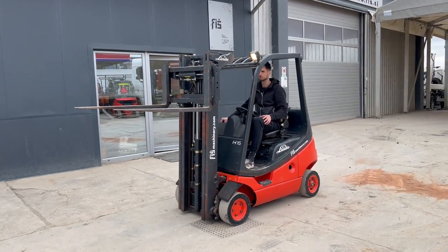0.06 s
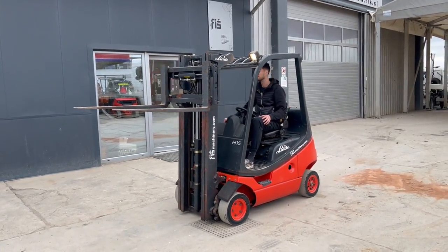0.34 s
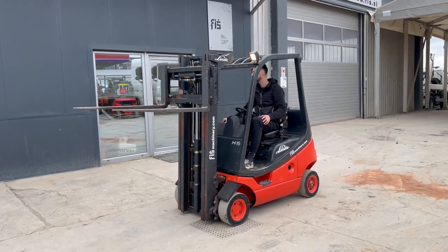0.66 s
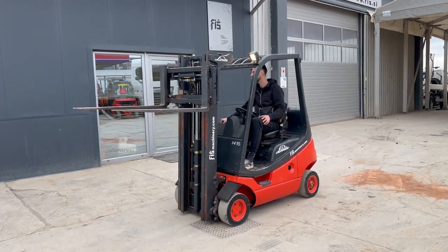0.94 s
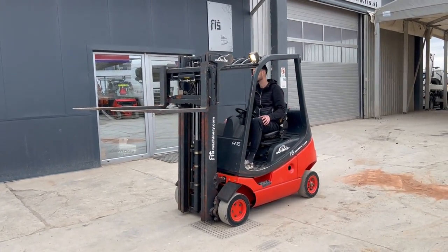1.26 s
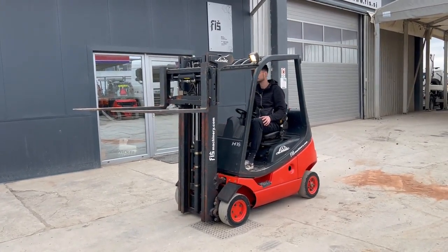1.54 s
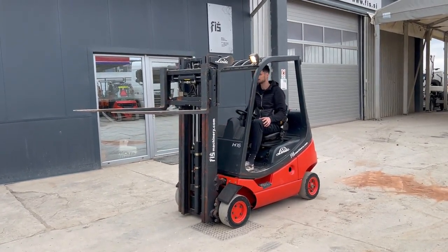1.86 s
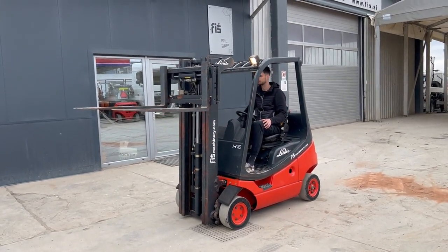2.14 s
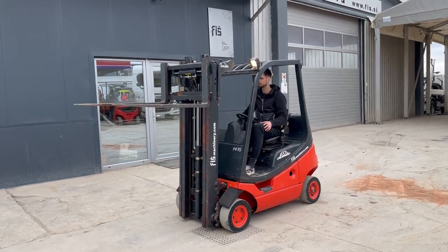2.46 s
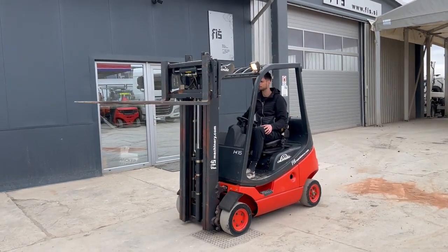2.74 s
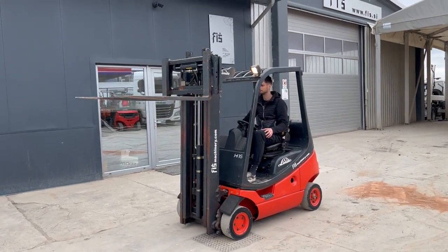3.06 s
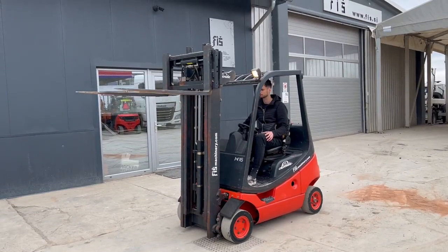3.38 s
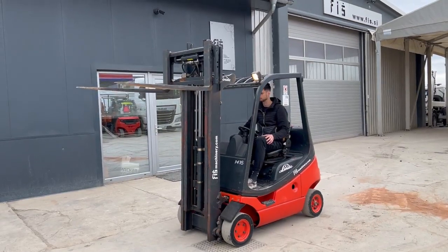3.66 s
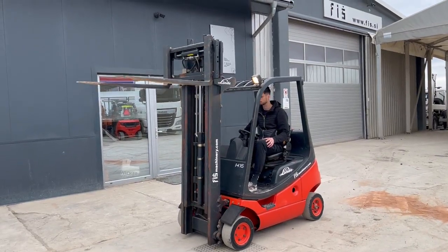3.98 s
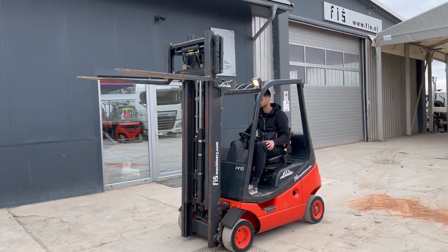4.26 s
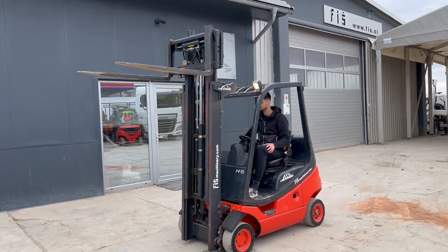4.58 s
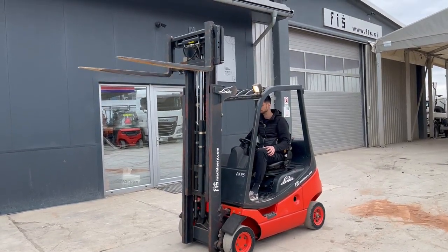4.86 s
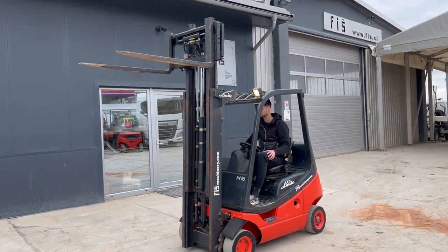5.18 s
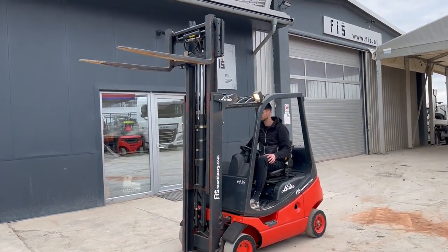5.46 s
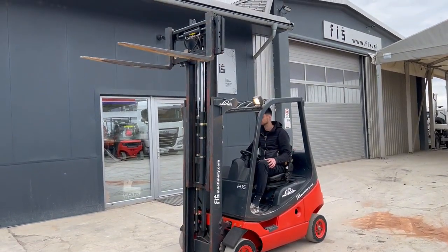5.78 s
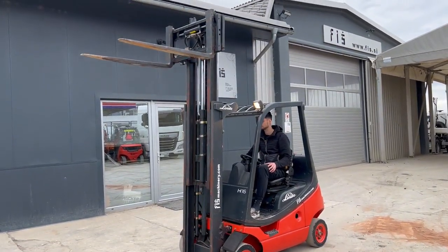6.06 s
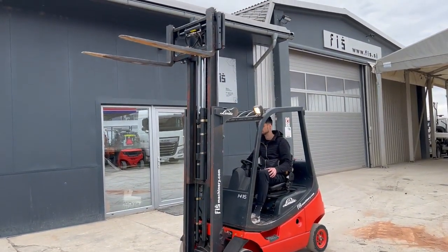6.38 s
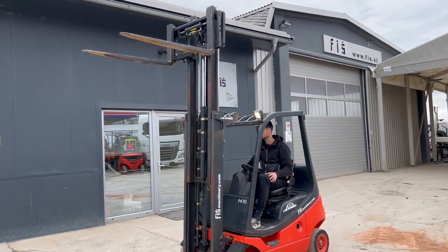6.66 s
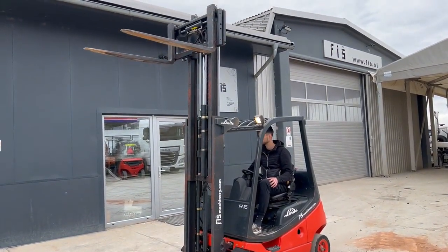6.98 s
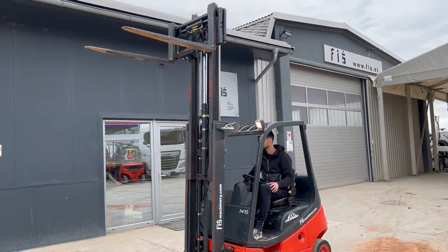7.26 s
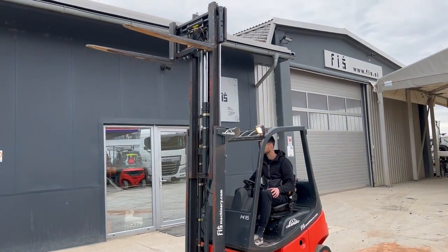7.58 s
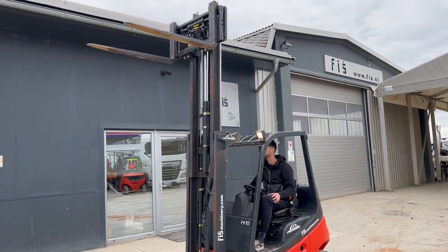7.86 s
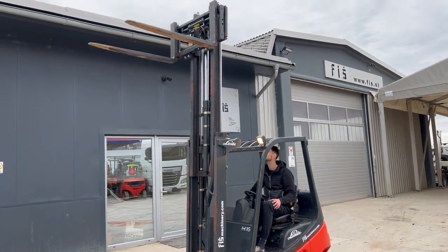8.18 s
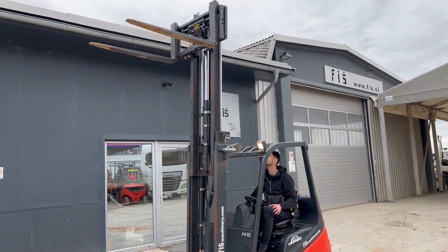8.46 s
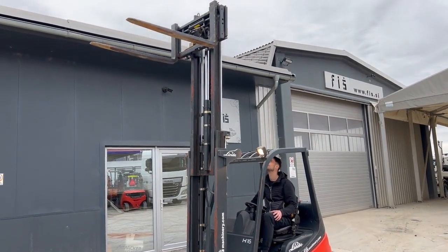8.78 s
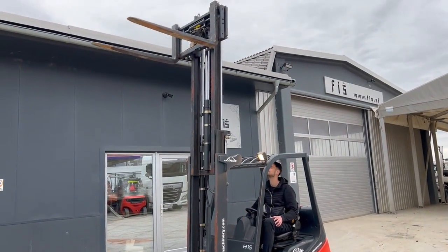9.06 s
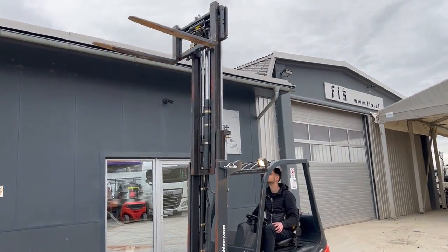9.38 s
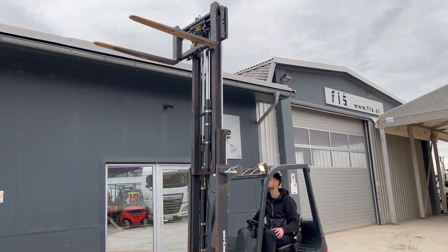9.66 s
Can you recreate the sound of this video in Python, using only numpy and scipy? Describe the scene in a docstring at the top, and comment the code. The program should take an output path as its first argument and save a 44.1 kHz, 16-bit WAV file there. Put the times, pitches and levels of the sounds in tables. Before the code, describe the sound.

Outdoors in gusty wind, a forklift's throbbing engine dips and picks up, its hydraulics whining as the steel mast clanks twice.

```python
"""A concrete yard in front of a shed wall, where a four-cylinder forklift is working.
Its engine sags, then revs up: the exhaust throbs, the block rumbles and the valve gear clatters.
The engine drives a whining gear pump, and oil hisses through valves and rushes as the forks rise.
The steel mast clanks twice as its stages take up the load. Gusts of wind buffet the microphone."""
import sys
import numpy as np
from scipy import signal
from scipy.fft import rfft, irfft
from scipy.io import wavfile
from scipy.ndimage import uniform_filter1d

SR = 44100
rng = np.random.default_rng(int(sys.argv[2]) if len(sys.argv) > 2 else 0)


def unload_wav(signal):
    """Save mono or channel-first audio to the path in sys.argv[1] as 16-bit WAV at rate SR, clipped to [-1, 1]."""
    wavfile.write(
        sys.argv[1],
        SR,
        np.round(np.clip(np.atleast_2d(signal).T, -1, 1) * 32767).astype(np.int16),
    )


N = 433040
T = np.arange(N) / SR
HZ = np.maximum(np.fft.rfftfreq(N, 1 / SR), 1)
NO_LOAD_HZ = 58.5   # firings per second with no load

# engine speed (time [s], firing rate [Hz])
ENGINE_SPEED = [(0, 50), (.3, 54.3), (.52, 54.4), (.8, 46.4), (1.04, 38.5), (1.29, 46.3), (1.48, 47),
                (1.62, 45.4), (2.03, 37.7), (2.62, 48.6), (3.03, 51.4), (3.52, 56.1), (3.85, 57.4),
                (4.9, 57.15), (5.8, 55.75), (6.6, 54.75), (7.88, 54.55), (8.08, 52.4), (8.4, 52.5),
                (8.7, 52.75), (9.82, 52.6)]
# the driver eases off the pedal (start [s], end [s], exhaust drop [dB])
PEDAL_OFF = [(-.3, 1.1, 9.5), (1.398, 2.14, 16)]
# four steps of engine load (share of full load [0-1])
LOAD_STEPS = [.1, .37, .6, 1]
# exhaust tones (waves per engine cycle [count], then a level at each load step [dB])
EXHAUST_TONES = [(4, -5.5, -26, -21, -30), (5, -40, -22, -32, -30), (6, -24, -25, -33, -22),
                 (7, -43, -26, -17, -13), (8, -2, -2.5, -2.5, -10.5), (9, -9, -15, -36, -19),
                 (10, -14.5, -24, -21.5, -20.5), (11, -21, -16, -42, -47), (12, -12.5, -5, -3, -0.5),
                 (13, -16, -13, -24, -13), (14, -17.5, -11.5, -21, -17), (15, -38, -18, -11.5, -20),
                 (16, -18, -19, -24, -8.5), (20, -22, -29, -31, -23), (21, -28, -22, -19.5, -31),
                 (23, -26.5, -36, -45, -27), (25, -24, -40, -35, -29), (28, -26.5, -33, -26.5, -43),
                 (31, -47, -51, -29, -27), (35, -20, -44, -38, -39), (39, -35, -36, -46, -42),
                 (49, -27.5, -37, -34, -50)]
# some cylinders fire harder than others (strength of each [dB])
CYLINDER_STRENGTH = [3, -1, 1, -2]
# tone colour of the engine block and of the valve gear (frequency [Hz], level [dB])
BLOCK_COLOUR = [(100, -5.5), (180, 4.5), (260, 0.5), (340, 1), (440, -1.5), (520, 1), (600, -2.5),
                (680, 0.5), (780, -3.5), (880, -10.5), (1060, -2.5), (1250, -6.5), (1500, -20.5),
                (2500, -30)]
CLATTER_COLOUR = [(700, -47), (1200, -2), (1500, 2), (1750, 3), (2000, 2), (2200, 0), (2500, -1.5),
                  (3100, -3), (4000, -6.5), (5000, -10), (7000, -13), (10000, -14), (15000, -20.5)]
# loudness of each part (at no-load speed [dB], loss as firing slows [dB/Hz], change when lifting [dB])
BLOCK_LOUDNESS = (-39.5, 0.17, 0.68)
CLATTER_LOUDNESS = (-46.5, 0.25, 1.87)
PUMP_LOUDNESS = (-44, 0.067, -2.5)
# notes of the valve cover (pitch [Hz], width [Hz], level [dB])
COVER_NOTES = [(1054, 29, -54), (1217, 34, -59.5), (1750, 91, -64), (2070, 120, -61), (2575, 210, -59),
               (3520, 320, -61)]
# pump sound given off by pipes and mast (frequency [Hz], running free [dB], lifting [dB])
PUMP_COLOUR = [(199, 4.5, -10), (283, 2, -7), (350, -8, -12), (503, -5, -9), (584, -14, 0),
               (675, -26, -0.5), (870, -29, -16.5), (1100, -8, -8), (1300, -21, -12), (1450, -14, -28),
               (2030, -20, -21), (2320, -23, -10), (2790, -23, -16), (3600, -21, -16), (4430, -24, -19),
               (4870, -25, -25), (5200, -22, -18), (6600, -43, -28), (7600, -40, -18.5), (8650, -43, -33)]
# single pump tones sing out as speed and oil column change
# (tone number [count], peak time [s], width [s], level [dB])
PUMP_SINGING = [(1, 0.49, 0.16, -43), (1, 2.58, 0.45, -41.5), (4, 0.68, 0.2, -48.5), (4, 1.42, 0.12, -46),
                (4, 3.17, 0.13, -52), (6, 4.8, 0.43, -53), (13, 4.3, .5, -64), (16, 4.8, .12, -62),
                (16, 6.24, .14, -60), (16, 7, 0.41, -66), (16, 9, .5, -66), (17, 3.2, .3, -68),
                (17, 5.55, 0.2, -57), (17, 7.2, 0.56, -65), (19, 4.1, 0.44, -63), (19, 9.4, 0.49, -70),
                (23, 4.55, 0.24, -60), (25, 7.2, .6, -65), (26, 9.05, 0.97, -61.5)]
# oil valves working as the truck moves about (opens [s], shuts [s], level [dB])
VALVE_OPENINGS = [(-.1, 0.412, -43), (.68, 1.325, -50.5)]
# wind strength (time [s], level [dB])
WIND_STRENGTH = [(0, -27), (.5, -28.5), (1.03, -19.5), (1.14, -32), (1.26, -20), (1.66, -40.5),
                 (2.1, -42.5), (2.9, -37), (3.55, -35), (3.8, -40.5), (5.15, -43), (5.45, -30),
                 (5.75, -33.5), (6.0, -25), (6.35, -31.5), (6.65, -27.5), (6.95, -30.5), (7.7, -32),
                 (8.0, -32.5), (8.5, -35), (8.8, -27.5), (9.5, -24.5), (9.82, -22.5)]
# tone colour of the wind (frequency [Hz], level [dB])
WIND_RUMBLE = [(20, -25), (32, -16), (48, -0.5), (70, 0), (110, -2), (160, -8), (220, -14), (320, -30),
               (500, -45), (1000, -95)]
# hard puffs of wind (time [s], level [dB], width [s], pitch [Hz])
WIND_PUFFS = [(.03, -24.5, 0.01, 199), (0.104, -19, 0.0086, 123), (0.249, -24.5, 0.035, 157),
              (0.349, -20.5, 0.025, 104), (0.789, -19, 0.038, 69.6), (0.893, -12, 0.0049, 140),
              (0.931, -17, 0.0064, 120), (.974, -18, 0.016, 170), (1.04, -19.5, 0.019, 82),
              (1.205, -18.5, 0.019, 176), (1.28, -16, 0.032, 103), (1.316, -13.5, 0.0078, 168),
              (1.352, -25.5, 0.022, 264), (1.508, -25, 0.015, 268), (1.555, -28, 0.0086, 266),
              (2.76, -21.5, 0.0055, 149), (2.783, -22, 0.007, 110), (2.87, -21.5, 0.019, 111),
              (2.904, -22, 0.0088, 110), (5.472, -30, 0.035, 61.4), (6.029, -25, 0.063, 87.3),
              (6.65, -23, 0.032, 113), (7.248, -25, 0.014, 98), (7.662, -25, 0.03, 61.6),
              (9.33, -19, 0.014, 124), (9.451, -21.5, 0.085, 79)]
# steel blows in the mast (time [s], level [dB], middle of the band [Hz], ringing [dB])
MAST_BLOWS = [(2.689, -19.5, 1120, -10), (2.712, -24, 1540, -12), (2.729, -20, 2010, -3.5),
              (2.74, -20.5, 480, -15), (2.757, -24, 357, -15), (2.836, -31.5, 796, -10),
              (7.894, -15, 2180, -2.5), (7.9, -18, 2600, 1), (7.912, -15, 990, -9),
              (7.921, -14.5, 2400, -18), (7.942, -17, 520, -9.5), (7.945, -18, 2300, -6),
              (7.955, -18.5, 520, -8)]
# ringing notes of the mast (pitch [Hz], level [dB], time to fade by 60 dB [s])
MAST_NOTES = [(269, -4, 0.28), (566, 1, 0.4), (622, 0, 0.4), (793, -17, 0.27), (1016, -2, 0.11),
              (1285, -12.5, 0.56), (1340, -4, 0.064), (1447, -7.5, 0.18), (1683, -8.5, 0.15),
              (1850, -20.5, 0.65), (2020, -3.5, 0.076), (2220, -6.5, 0.04), (2490, -6, 0.064),
              (2715, -10.5, 0.18), (3670, -10, 0.096), (3950, -11, 0.1), (5260, -14, 0.25)]
# crash of many crowded steel notes (frequency [Hz], level [dB])
CRASH_COLOUR = [(150, -25), (270, 6.5), (450, 7.5), (640, 6.5), (850, -2), (1200, -2.5), (1800, -6.5),
                (2400, -8.5), (3200, -9.5), (4000, -15), (4700, -16.5), (5350, -12.5), (6300, -14.5),
                (8000, -15), (15000, -12.5)]
# notes of the lift cylinder as oil flows (peak time [s], width [s], pitch [Hz], level [dB])
OIL_NOTES = [(4.1, 1, 1000, -56), (7.5, 0.82, 1230, -53.5), (4.2, 0.51, 1510, -53), (5.1, 1, 1960, -57),
             (4.9, 0.62, 2450, -54.5), (4.3, .4, 3700, -58), (6.2, 0.49, 2090, -52.5),
             (6.4, 0.66, 2600, -62), (7.4, 0.76, 3570, -60)]
# how alike the two microphones sound (frequency [Hz], likeness [0-1])
MIC_LIKENESS = [(200, 0.91), (450, 0.81), (700, 0.48), (1100, 0.57), (1500, 0.08), (2000, 0.57),
                (5300, 0.37), (7200, 0.74), (8500, 0.68), (9500, 1), (10700, 1), (11500, 0.91),
                (13000, 0.99)]
# how much louder the left one is (frequency [Hz], left minus right [dB])
LEFT_LOUDER = [(200, -3), (450, 1.5), (700, 1), (1100, 4), (2400, 0.8), (5300, 6), (7200, 2.5),
               (9500, -0.5)]
# how far the left one's wave runs ahead (frequency [Hz], phase [rad])
LEFT_AHEAD = [(0, 0.42), (450, 0.32), (1100, 1.08), (1500, 2.5), (2000, 5.37), (2900, 7.82), (5300, 5.6),
              (7200, 5.8), (8600, 4.9), (9400, 3.17), (10700, 3.11), (11300, 1.72), (12600, 0.68)]


def from_db(db):
    """Turn decibels into a number to multiply by."""
    return 10 ** (np.asarray(db) / 20)


def rms_one(x):
    """Scale a sound to an average strength (rms) of 1."""
    return x / np.sqrt(np.mean(x ** 2) + 1e-20)


def in_time(points):
    """Read a time table at every sample."""
    return np.interp(T, *np.transpose(points))


def at_hz(points):
    """Read a frequency table at every frequency, with octaves evenly spaced."""
    hz, value = np.transpose(points)
    return np.interp(np.log(HZ), np.log(np.maximum(hz, 1)), value)


def colour(x, spectrum):
    """Give a sound a tone colour, at strength 1."""
    return rms_one(irfft(rfft(x) * from_db(at_hz(spectrum)), N))


def resonate(x, hz, width_hz):
    """Keep a narrow band of a sound, at strength 1."""
    band = signal.butter(1, [hz - width_hz / 2, hz + width_hz / 2], "band", fs=SR)
    return rms_one(signal.lfilter(*band, x))


def drift(per_s):
    """A random wander, about 1 either side of zero."""
    return np.interp(T * per_s, np.arange(2048), rng.standard_normal(2048))


def ramp(start_s, length_s):
    """A straight rise from 0 to 1."""
    return np.clip((T - start_s) / length_s, 0, 1)


def swell(peak_s, width_s):
    """A smooth rise to 1 and fall."""
    return np.exp(-np.minimum(((T - peak_s) / width_s) ** 2 / 2, 50))


def running_db(loudness, firing_hz, pressure):
    """A part grows louder with speed and changes with oil pressure."""
    top_db, slope, lifting_db = loudness
    return top_db - slope * (NO_LOAD_HZ - firing_hz) + lifting_db * pressure


def governor(firing_hz, full_load_drop_hz=9.74, ease_s=0.088, press_s=0.14):
    """A slowed engine is under load and gets more fuel; off the pedal, the exhaust goes quiet."""
    load = np.clip((NO_LOAD_HZ - firing_hz) / full_load_drop_hz, 0, 1)
    drop_db = sum(db * (ramp(off, ease_s) - ramp(on, press_s)) for off, on, db in PEDAL_OFF)
    exhaust_db = -30.5 + 2.5 * load - drop_db
    return load, exhaust_db


def exhaust(cycle, level_db, load, smear=0.0097, uneven_db=0.6):
    """The firings make every fourth tone; uneven cylinders add the rest and make the beat limp."""
    waver_db = 0.8 + 1.8 * load ** 2
    out = np.zeros(N)
    for k, *by_load_db in EXHAUST_TONES:
        sign = -1 if k % 4 else 1
        shift = smear * k * rng.standard_normal()   # the silencer smears high tones most
        tone = sign * np.sin(2 * np.pi * (k * cycle + shift))
        out += tone * from_db(np.interp(load, LOAD_STEPS, by_load_db) + waver_db * drift(6))
    firing_strength = np.interp(4 * cycle, np.arange(1024), rng.standard_normal(1024))
    return np.sqrt(2) * from_db(level_db + uneven_db * firing_strength) * out


def engine_noise(cycle, spectrum, repeat, throb, scatter_db, size=3072):
    """The same knocks return every cycle, mixed with fresh noise; each firing makes them swell."""
    pattern = rng.standard_normal((2, size))
    returning = np.array([np.interp(cycle % 1 * size, np.arange(size), p) for p in pattern])
    fresh = rng.standard_normal((2, N))
    knocks = np.sqrt(repeat) * rms_one(returning) + np.sqrt(1 - repeat) * fresh
    firing = 4 * cycle
    firing_db = np.resize(CYLINDER_STRENGTH, 1024) + scatter_db * rng.standard_normal(1024)
    pulse = from_db(firing_db)[firing.astype(int)] * np.exp(-4 * (firing % 1))
    return colour(knocks * (1 + throb * pulse), spectrum)


def tappet(cycle, firing_hz, tick_cycles=0.16, scatter_db=1.4, db_per_hz=0.5):
    """A loose tappet (valve pusher) rings the valve cover once a cycle, softer at low speed."""
    age = cycle % 1 / tick_cycles
    strength = from_db(scatter_db * rng.standard_normal(1024))[cycle.astype(int)]
    rattle = strength * age * np.exp(-age) * rng.standard_normal((2, N))
    ring = sum(from_db(db) * resonate(rattle, hz, width_hz) for hz, width_hz, db in COVER_NOTES)
    return ring * from_db(-db_per_hz * (NO_LOAD_HZ - firing_hz))


def pump(cycle, firing_hz, level_db, pressure, flutter_db=3, churn_rad=0.74):
    """A twelve-tooth gear pump ripples the oil six times per firing, harsher when lifting."""
    angle = 2 * np.pi * 24 * cycle
    tooth_hz = 6 * firing_hz
    out = np.zeros((2, N))
    hz, *states = np.transpose(PUMP_COLOUR)
    for k in range(1, 28):
        free_db, lifting_db = [np.interp(k * tooth_hz, hz, db) for db in states]
        whine = from_db(level_db + free_db + pressure * (lifting_db - free_db))
        song = sum(from_db(db) * swell(s, width) for tone, s, width, db in PUMP_SINGING if tone == k)
        blur = churn_rad * drift(60)   # churning oil roughens the tones
        gain = np.hypot(whine, song) * from_db(flutter_db * drift(12))
        out += gain * np.sin(k * angle + blur + 2 * np.pi * rng.random((2, 1)))
    return out


def valve_hiss(open_s=0.052, fade_s=0.04):
    """Oil hisses through a valve until it shuts."""
    spectrum = [(1000, 0.5), (2500, 0), (3800, -0.5), (6000, -10.5), (10000, -9.5), (15000, -13.5)]
    flow = sum(from_db(db) * ramp(opens, open_s) * np.exp(-np.maximum(T - shuts, 0) / fade_s)
               for opens, shuts, db in VALVE_OPENINGS)
    return flow * colour(rng.standard_normal((2, N)), spectrum)


def wind(lumps_db=2.5, lumps_per_s=11, apart_db=-19):
    """Swirling air rumbles on the microphone, nearly alike on both sides; short puffs reach higher."""
    level_db = in_time(WIND_STRENGTH) + lumps_db * drift(lumps_per_s)
    swirls = colour(rng.standard_normal((2, N)), WIND_RUMBLE)
    swirl_strength = np.sqrt(uniform_filter1d(swirls ** 2, size=4000) + 1e-6)
    out = from_db(level_db) * swirls / swirl_strength
    for s, db, width_s, hz in WIND_PUFFS:
        near = np.abs(T - s) < 0.2
        narrow = signal.butter(2, [hz / 2, hz * 1.24], "band", fs=SR, output="sos")
        wide = signal.butter(2, [hz / 2, hz * 2.24], "band", fs=SR, output="sos")
        air = signal.sosfilt(np.vstack([narrow, wide]), rng.standard_normal((2, SR)))
        push = swell(s, width_s)[near]
        puff = push * air[:, -len(push):]
        out[:, near] += from_db(db) * puff * np.sqrt(np.sum(push ** 2) / np.sum(puff[0] ** 2))
    shared, apart = out
    return shared + from_db(apart_db) * apart * [[1], [-1]]


def mast_clanks(attack_s=0.0027, crash_s=0.013, echo_s=0.076, detune=0.0023, hard_db=-16, size=28000):
    """Each blow rings the steel rails; its crash dies fast and echoes between the walls."""
    out, t = np.zeros((2, N + size)), np.arange(size) / SR
    crash_noise = colour(rng.standard_normal((2, N)), CRASH_COLOUR)
    fade = from_db(1) * np.exp(-t / crash_s) + from_db(-13) * np.exp(-t / echo_s)
    for k, (s, db, middle_hz, ring_db) in enumerate(MAST_BLOWS):
        softness_db = max(hard_db - db, 0)   # gentle blows leave the high notes quiet
        ring = 0
        for hz, note_db, fade_s in MAST_NOTES:
            rail_hz = hz * (1 + detune * rng.standard_normal((2, 1)))   # near-twin rails beat
            gain = from_db(note_db - softness_db * hz / 4000 - 60 * t / fade_s)
            ring += gain * np.sin(2 * np.pi * (rail_hz * t + rng.random((2, 1))))
        crash = fade * crash_noise[:, k * size:(k + 1) * size]
        blow = np.minimum(t / attack_s, 1) * (from_db(ring_db) * ring + crash)
        # edges clash high, the fork carriage thuds low
        contact = signal.butter(2, [middle_hz / 2, middle_hz * 2], "band", fs=SR)
        start = int(s * SR)
        out[:, start:start + size] += from_db(db) * signal.lfilter(*contact, blow)
    return out[:, :N]


def oil_rush(width_hz=100):
    """Flowing oil stirs one note of the lift cylinder after another as the mast extends."""
    return sum(from_db(db) * swell(s, width_s) * resonate(rng.standard_normal((2, N)), hz, width_hz)
               for s, width_s, hz, db in OIL_NOTES)


def microphones(pair):
    """Two unrelated sounds become the shared and the unshared part of left and right."""
    shared, apart = rfft(pair)
    alike, sides = np.clip(at_hz(MIC_LIKENESS), 0, 1), np.array([[1], [-1]])
    both = np.sqrt((1 + alike) / 2) * shared + np.sqrt((1 - alike) / 2) * apart * sides
    balance = from_db(sides * at_hz(LEFT_LOUDER) / 2)
    lead = np.interp(HZ, *np.transpose(LEFT_AHEAD))
    return irfft(both * balance * np.exp(0.5j * sides * lead), N)


def scene(speed_wobble=0.001205):
    """One turning shaft times the engine and pump; oil, mast and wind sound on top."""
    firing_hz = in_time(ENGINE_SPEED) * (1 + speed_wobble * drift(10))
    cycle = np.cumsum(firing_hz) / (4 * SR)   # engine cycles so far, four firings each
    load, exhaust_db = governor(firing_hz)
    pressure = ramp(start_s=2.3, length_s=0.93)   # the lift valve opens and oil pressure builds
    block = engine_noise(cycle, BLOCK_COLOUR, repeat=0.39, throb=0.29, scatter_db=0.5)
    block *= from_db(running_db(BLOCK_LOUDNESS, firing_hz, pressure))
    clatter = engine_noise(cycle, CLATTER_COLOUR, repeat=0.44, throb=0.28, scatter_db=3.5)
    clatter *= from_db(running_db(CLATTER_LOUDNESS, firing_hz, pressure))
    engine = block + clatter + tappet(cycle, firing_hz)
    whine = pump(cycle, firing_hz, running_db(PUMP_LOUDNESS, firing_hz, pressure), pressure)
    truck = microphones(engine + whine + oil_rush() + valve_hiss() + mast_clanks())
    return truck + exhaust(cycle, exhaust_db, load) + wind()


def record(dry, low_hz=25, high_hz=15200):
    """Cut the deepest rumble and the highest treble."""
    dry = signal.sosfilt(signal.butter(2, low_hz, "high", fs=SR, output="sos"), dry)
    return signal.sosfilt(signal.ellip(10, 0.1, 90, high_hz, fs=SR, output="sos"), dry)


dry = scene()
out = record(dry)
unload_wav(out)
```